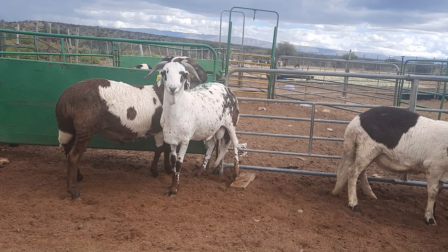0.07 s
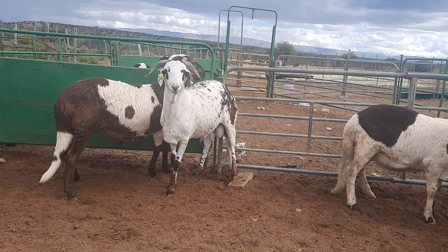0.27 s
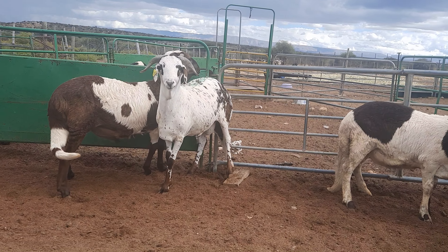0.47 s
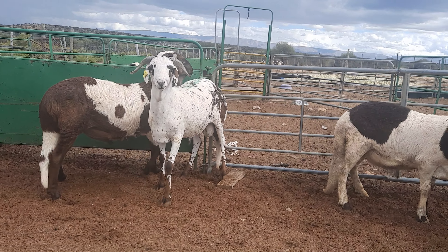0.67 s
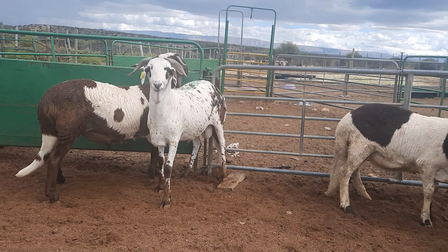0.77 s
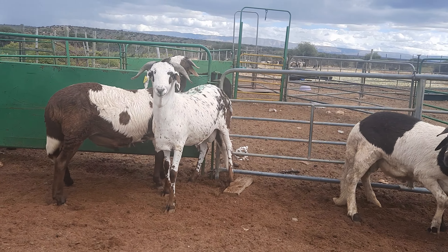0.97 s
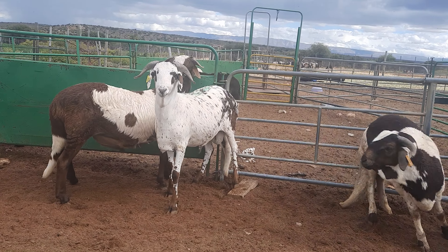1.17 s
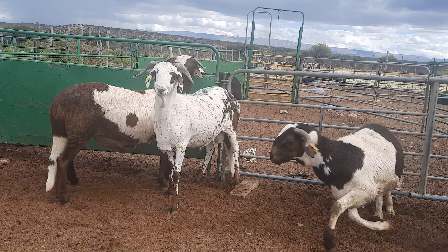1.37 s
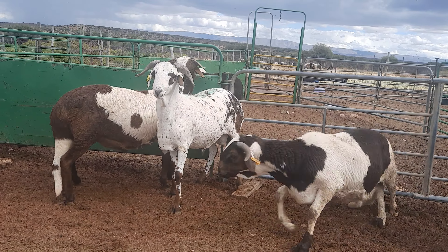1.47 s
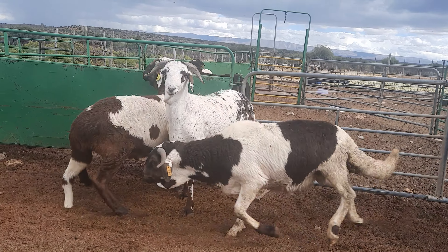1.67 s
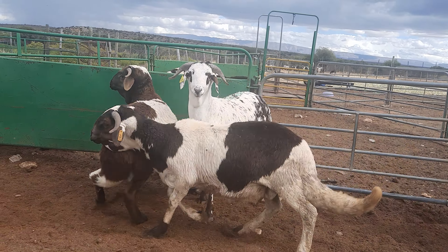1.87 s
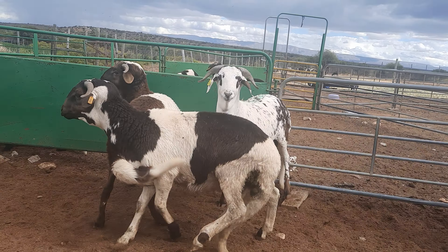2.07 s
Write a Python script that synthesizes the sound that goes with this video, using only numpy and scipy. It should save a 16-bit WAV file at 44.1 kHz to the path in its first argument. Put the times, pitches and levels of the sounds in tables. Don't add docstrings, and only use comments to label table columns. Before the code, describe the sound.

Sheep hooves scuffing and thudding on pen dirt, with wind buffets and small birds twittering

```python
import sys
import numpy as np
from scipy import signal
from scipy.fft import rfft, irfft
from scipy.io import wavfile
from scipy.ndimage import uniform_filter1d

SR = 44100
rng = np.random.default_rng(int(sys.argv[2]) if len(sys.argv) > 2 else 0)


def dump(signal):
    limited = np.clip(np.atleast_2d(signal).T, -1, 1)
    pcm = np.round(limited * 32767).astype(np.int16)
    wavfile.write(sys.argv[1], SR, pcm)


def to_linear_factor(level_db):
    exponent = np.asarray(level_db, float) / 20
    return 10 ** exponent


N = 94815
T = np.arange(N) / SR


def evened(x):
    return x / np.sqrt(np.mean(x ** 2) + 1e-20)


def curve(rows, k=1):
    rows = np.array(rows)
    return np.interp(T, rows[:, 0], rows[:, int(k)])


def coloured(x, points):
    hz = np.fft.rfftfreq(N, 1 / SR)
    f, db = np.transpose(points)
    gain = to_linear_factor(np.interp(np.log(hz + 1), np.log(f + 1), db))
    return evened(irfft(rfft(x) * gain, N))


def resonate(x, hz, width_hz):
    turn = np.exp(2j * np.pi * np.cumsum(hz * np.ones(N)) / SR)
    r = np.exp(-np.pi * abs(width_hz) / SR)
    return 2 * (turn * signal.lfilter([1 - r], [1, -r], x * turn.conj())).real


def gritty(per_s, spread_db, bed):
    size = to_linear_factor(spread_db * rng.exponential(1, (2, N)).clip(0, 2.5))
    grains = size * (rng.random((2, N)) < per_s / SR)
    return rng.standard_normal((2, N)) * (evened(grains) + bed)


def placed(pair, same, pan_db, count):
    same = np.clip(same, 0, 1)
    left = same * np.roll(pair[0], count) + np.sqrt(1 - same ** 2) * pair[1]
    return np.array([left * to_linear_factor(pan_db / 2), pair[0] * to_linear_factor(-pan_db / 2)])


def swell(start_s, rise_s, t60_s):
    u = T - start_s
    return np.clip(u / rise_s, 0, 1) ** 2 * to_linear_factor(-60 * np.maximum(u - rise_s, 0) / t60_s)


def lumps(width_s, depth_db):
    slow = uniform_filter1d(rng.standard_normal((2, N)), int(width_s * SR))
    return to_linear_factor(depth_db * evened(slow))


def pop(s, db, hz, length_s):
    out = np.zeros(N)
    near = abs(T - s) < 2 * length_s
    u = T[near] - s
    out[near] = to_linear_factor(db) * np.cos(2 * np.pi * hz * u) * np.exp(-(u / (0.31 * length_s)) ** 2)
    return out


def open_air():
    # frequency in Hz, level in dB per Hz.
    air_spectrum = [(60, 1), (320, -2), (850, -22), (3300, -26.5), (7000, -28), (15800, -33)]
    noise = rng.standard_normal((2, N)) * lumps(0.011, 0.27)
    return to_linear_factor(-64.5) * placed(coloured(noise, air_spectrum), 0.055, -5.0, count=4)


def note(start_s, length_s, db, hz):
    out = np.zeros(N)
    on = (T > start_s) & (T < start_s + length_s)
    level = to_linear_factor((db + 0 * T)[on] + 1.0)
    ends = np.sin(np.pi * (T[on] - start_s) / length_s) ** 0.23
    out[on] = level * ends * np.sin(2 * np.pi * np.cumsum(hz[on]) / SR)
    return out


def near_birds():
    # start in seconds, length in seconds, level in dB, from Hz, to Hz.
    slides = [(0.031, 0.031, -64.5, 4000, 3180), (0.497, 0.021, -53, 4440, 3630),
              (0.866, 0.042, -71, 3410, 3740), (1.013, 0.043, -69.5, 3950, 2600),
              (1.193, 0.039, -65, 3790, 3900), (1.211, 0.03, -67.5, 7500, 7400),
              (1.795, 0.014, -66, 4060, 3720), (1.869, 0.0077, -58.5, 8040, 7900),
              (1.884, 0.024, -57.5, 7325, 7430), (2.047, 0.02, -66, 4390, 3570),
              (0, 0.002, -62, 5400, 5470), (0.016, 0.013, -65, 4000, 4600), (.053, 0.014, -86, 8100, 6500),
              (0.084, 0.013, -67.5, 4140, 4400), (0.105, 0.0071, -64, 5660, 5650),
              (0.11, 0.036, -78, 5680, 5500), (0.266, .014, -60, 4000, 3540),
              (1.086, 0.02, -69, 3000, 4230), (1.106, 0.07, -71, 4230, 4570),
              (1.194, 0.028, -67, 4400, 4480), (1.3, 0.06, -76, 3640, 2560),
              (1.368, 0.035, -72.5, 5570, 4620), (1.524, .01, -68, 6100, 5300),
              (1.848, .045, -73, 5450, 5080), (1.9, 0.0036, -61, 7600, 8000)]
    # time in seconds, pitch in Hz, level in dB.
    phrases = [
        [(.212, 5400, -61), (.229, 4950, -51), (.241, 4350, -56), (.256, 4190, -49), (.274, 4360, -50),
         (.288, 3950, -53), (.312, 2450, -66)],
        [(.32, 2603, -58), (.331, 3980, -56), (.343, 4200, -51), (.355, 3970, -52.5), (.368, 3460, -54)],
        [(1.124, 2400, -66), (1.131, 3700, -61), (1.137, 4100, -64), (1.142, 3600, -59), (1.147, 2900, -65)],
        [(1.15, 2700, -67), (1.157, 3700, -60), (1.162, 4500, -65)],
        [(1.165, 3800, -69), (1.171, 3400, -69), (1.178, 4200, -65), (1.185, 4700, -67), (1.194, 4400, -62),
         (1.198, 3900, -64)],
    ]
    song = np.zeros(N)
    for p in phrases:
        pitch_hz = uniform_filter1d(curve(p), size=180)
        song += note(p[0][0], p[-1][0] - p[0][0], curve(p, 2) + 2, pitch_hz)
    for s, length_s, db, from_hz, to_hz in slides:
        glide_hz = from_hz + (to_hz - from_hz) * np.clip((T - s) / length_s, 0, 1)
        song += note(s, length_s, db, glide_hz)
    song = song * lumps(.004, 1.8)[0] ** (1 + (T > 1.))
    scatter_n, scatter_t60_s = 12000, .2
    tail = rng.standard_normal((2, scatter_n)) * to_linear_factor(-60 * T[:scatter_n] / scatter_t60_s)
    wet = signal.fftconvolve(song[None], tail / np.linalg.norm(tail[0]), axes=1)[:, :N]
    return placed([song, song], 0.98, -12, count=2) + to_linear_factor(-10) * wet


def far_flock():
    # time in seconds, centre in Hz, level in dB.
    twitter = [(.2, 5660, -74), (.36, 5900, -77), (.6, 6060, -71), (.68, 5900, -64), (.88, 5700, -66.5),
               (1.08, 7100, -68), (1.3, 7300, -77.5)]
    # time in seconds, level in dB.
    chatter = [(0, -72.5), (.15, -71), (.2, -74), (.5, -67.5), (.7, -74.5), (1.15, -64), (1.6, -73.5),
               (1.9, -69.5)]
    twitter_width_hz, chatter_hz, chatter_width_hz = 1860, 4000, 3200
    hz = curve(twitter)
    z = rng.standard_normal((2, N)) * lumps(0.0045, 2.2)
    high = resonate(resonate(z, hz, twitter_width_hz), hz, twitter_width_hz)
    low = resonate(resonate(z[::-1], chatter_hz, chatter_width_hz), chatter_hz, chatter_width_hz)
    far = evened(high) * to_linear_factor(curve(twitter, 2)) + evened(low) * to_linear_factor(curve(chatter))
    return placed(far, 0.057, -1.5, count=20)


def whistle():
    # time in seconds, level in dB.
    whistle_level = [(.1, -68), (.115, -62.5), (.13, -75), (.14, -71), (.15, -79), (.162, -63), (.2, -72),
                     (.207, -85), (.23, -67.5), (.26, -81), (.28, -66), (.3, -84)]
    waver = rng.standard_normal(N) * lumps(0.0045, 2.2)[0]
    pitch_hz = 1906 + 25 * evened(uniform_filter1d(waver, 400))
    return note(0.1, 0.33, curve(whistle_level), pitch_hz)


def wind():
    # time in seconds, left port in dB, right port in dB.
    gusts = [(0, -59, -83), (.07, -51.5, -66), (.18, -55.5, -85), (.22, -40.5, -67), (.27, -36, -41),
             (.39, -40.5, -48.5), (.48, -31.5, -49.5), (.6, -44, -55), (.68, -53, -57), (.8, -42.5, -48),
             (1., -65, -41.5), (1.14, -51, -61), (1.22, -96, -95), (1.5, -67, -61), (2.15, -74, -85)]
    # time in seconds, peak in dB, frequency in Hz.
    buffets = [
        (0.221, -22, 81),
        (0.428, -22, 112),
        (.498, -25, 107),
        (0.575, -33, 110),
    ]
    gust_hz = 62.8
    z = rng.standard_normal((2, N))
    low = evened(resonate(resonate(z, gust_hz, 36.5), gust_hz, 51))
    low = low + to_linear_factor(-12) * evened(resonate(resonate(z, 116, 75), 110, 140))
    highpass = signal.butter(4, 44, "high", fs=SR, output="sos")
    low = signal.sosfilt(highpass, low * lumps(0.039, 1.6))
    out = evened(low) * to_linear_factor(np.array([curve(gusts), curve(gusts, 2)]))
    for s, db, hz in buffets:
        out[0] -= pop(s, db, hz, 1.75 / hz)
    return out


def tread():
    # time in seconds, heavy thudding in dB, light patter in dB.
    tread_level = [(0, -95, -102), (.2, -75, -77), (.33, -62, -54.5), (.55, -49.5, -57.5), (.7, -61, -53),
                   (.78, -73, -52), (1., -54.5, -59.5), (1.08, -58.5, -59.5), (1.3, -56, -53.5),
                   (1.47, -48, -52.5), (1.78, -50.5, -66), (1.92, -60, -64), (2.08, -63.5, -62.5),
                   (2.15, -52, -69)]
    # frequency in Hz, level in dB.
    ground = [(120, -2), (185, -2.5), (278, -1), (365, -14), (610, -14)]
    z = rng.standard_normal((2, N))
    rumble = 0
    for k, (hz, db) in enumerate(ground):
        steps = z * lumps(0.041, 5.27)[0]
        ring = evened(resonate(resonate(steps, hz, 0.17 * hz + 12), hz, 2.8 * hz))
        column = 1 + (k > 1)
        rumble = rumble + to_linear_factor(db + curve(tread_level, column)) * ring
    return placed(rumble, 0.95, -0.99, count=1)


def thrown_grit():
    # start in seconds, rise in seconds, t60 in seconds, level in dB.
    throws = [
        (.26, 0.042, 0.47, -65),
        (.4, 0.16, 3., -70.5),
        (0.711, 0.063, 0.24, -62),
        (0.967, 0.0076, 0.058, -50),
        (1.001, 0.031, 0.71, -69.5),
        (1.51, 0.051, 0.19, -58),
        (1.77, 0.0028, 0.096, -69),
        (1.78, 0.082, 1., -67),
        (2.07, 0.0078, 0.58, -68.5),
    ]
    grit_hz, width_hz = 12100, 16000
    sand = gritty(2500, 3.5, 2.5)
    hiss = evened(resonate(resonate(sand, grit_hz, width_hz), grit_hz, width_hz))
    level = sum(to_linear_factor(db) * swell(s, rise_s, t60_s) for s, rise_s, t60_s, db in throws)
    return placed(hiss * level, .5, -4.5, count=15)


def scuffs():
    # start in seconds, rise in seconds, t60 in seconds, level in dB, centre in Hz.
    drags = [(0.278, 0.075, 0.73, -51.5, 2200), (0.46, 0.024, 0.14, -50, 1170),
             (0.509, 0.024, 1, -53, 1210), (0.636, 0.004, 0.097, -56, 1740),
             (0.651, 0.023, 0.056, -54.5, 920), (.76, 0.018, 0.16, -70, 980),
             (1.28, 0.0092, 0.88, -55, 1580), (1.857, 0.0028, 0.15, -62, 1090), (1.59, 0.017, 1, -64, 696),
             (1.769, 0.0039, 0.22, -60.5, 2100), (2.081, 0.019, 0.71, -54.5, 1200)]
    dirt = gritty(1500, 4., 1.2)
    out = 0
    for s, rise_s, t60_s, db, hz in drags:
        scrape = evened(resonate(resonate(dirt, hz, 1.53 * hz), hz, 2 * hz))
        out = out + to_linear_factor(db) * swell(s, rise_s, t60_s) * scrape
    return placed(out, .5, -2.5, count=8)


def knocks():
    # time in seconds, peak in dB, frequency in Hz, length in seconds.
    hoof_knocks = [(0.487, -43.5, 600, 0.0096), (0.545, -39.5, 860, 0.0025), (0.486, -42.5, 2184, 0.0014),
                   (.524, -47.5, 1380, 0.0066), (0.548, -47, 650, 0.0044), (0.582, -42.5, 1190, 0.0025),
                   (0.622, -45, 1100, 0.0038), (0.6404, -39.5, 730, 0.0045), (0.641, -39, 2000, .001),
                   (0.652, -45, 2300, 0.0014), (0.675, -42.5, 833, 0.0027), (.642, -27.5, 398, 0.0092),
                   (0.656, -35, 490, 0.004), (0.665, -35.5, 450, 0.0025), (1.7714, -60, 1460, 0.0017),
                   (1.776, -42.5, 215, 0.0056), (1.865, -40.5, 376, 0.0084), (1.872, -42, 171, 0.021),
                   (1.86, -50, 1090, 0.0028), (2.093, -46, 136, 0.017)]
    out = sum(pop(*row) for row in hoof_knocks)
    return placed([out, out], 1, -1.1, count=0)


def ticks():
    # time in seconds, level in dB.
    specks = [(.628, -63), (1.555, -62), (1.562, -70), (1.685, -59), (1.7733, -47.5), (1.797, -49),
              (1.813, -54), (1.842, -58), (1.859, -70), (1.925, -56), (2.09, -60)]
    # time in seconds, peak in dB, frequency in Hz, length in seconds.
    snaps = [
        (.9909, -41, 9500, .0007),
        (.9918, -31, 12000, .0007),
        (.9918, -44, 5000, .0006),
        (2.04285, -37, 2700, .002),
        (2.04285, -40, 5500, .001),
        (2.04285, -43, 8000, .001),
        (2.04285, -46, 11500, .0008),
        (2.043, -43, 1400, .0012),
    ]
    # time in seconds, peak in dB, ring in Hz, ring t60 in seconds, sharp edge in dB.
    pebbles = [
        (0.991, -46, 1904, 0.032, -31),
        (2.0424, -52, 2600, .02, -34),
    ]
    edge = rng.standard_normal((2, N))
    edge = edge - resonate(edge, 100, 3800)
    speck_level = sum(to_linear_factor(db) * swell(s, .0004, .01) for s, db in specks)
    out = placed(resonate(edge, 5500, 9000) * speck_level, .7, -4, count=12)
    crack = -sum(pop(*row) for row in snaps)
    out += placed([crack, crack], 0.95, -7.5, count=3)
    for s, db, hz, t60_s, edge_db in pebbles:
        dust = swell(s - .001, .0012, .004) + .3 * swell(s, .002, .03)
        spray = to_linear_factor(edge_db - 8) * dust * edge
        ring = to_linear_factor(db) * swell(s, 0.000049, t60_s) * np.sin(2 * np.pi * hz * (T - s))
        out = out + placed(ring + spray, .7, -5, count=17 if s < 1.5 else 1)
    return out


def panel():
    # time in seconds, level in dB, t60 in seconds.
    blows = [
        (1.2382, -61, 0.26),
        (1.4257, -56.5, 0.35),
    ]
    # mode in Hz, level in dB.
    steel_modes = [(1900, 11), (2170, 16), (2370, 9.5), (2632, 11), (2900, 6), (3134, 1), (3388, 7),
                   (3652, 7), (6250, 8)]
    mode_width_hz, rattle_hz, rattle_db, hold_s = 22, 2000, 5, .03
    z = gritty(1500, 3., 3.)
    modes = evened(sum(to_linear_factor(db) * evened(resonate(z, hz, mode_width_hz)) for hz, db in steel_modes))
    rattle = evened(resonate(resonate(z, rattle_hz, 2200), rattle_hz, 2800))
    level = 0
    for s, db, t60_s in blows:
        level = level + to_linear_factor(db) * (T > s) * to_linear_factor(-60 * np.maximum(T - s - hold_s, 0) / t60_s)
    return placed((modes + to_linear_factor(rattle_db) * rattle) * level, 0.069, -4.5, count=15)


def scene():
    animals = near_birds() + far_flock() + whistle() + tread() + thrown_grit() + scuffs() + knocks()
    mix = open_air() + wind() + animals + ticks() + panel()
    soft = rfft(mix) * (np.fft.rfftfreq(N, 1 / SR) < 15800)
    return irfft(soft, N) + pop(.9918, -48, 16200, .001) + pop(.975, -56, 16200, .006)


def top_cut(x):
    return signal.sosfilt(signal.butter(12, 16640, fs=SR, output="sos"), x)


def record(dry):
    return top_cut(dry)


dry = scene()
out = record(dry)
dump(out)
```